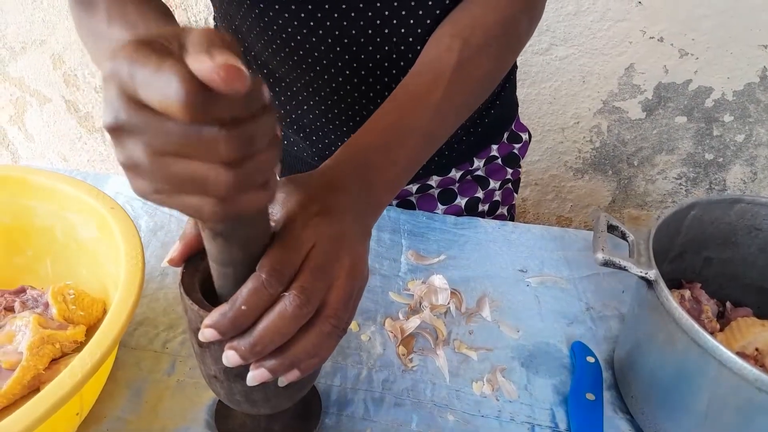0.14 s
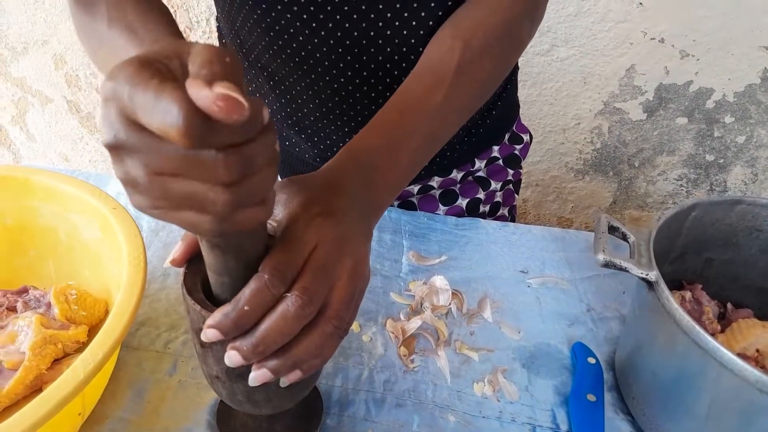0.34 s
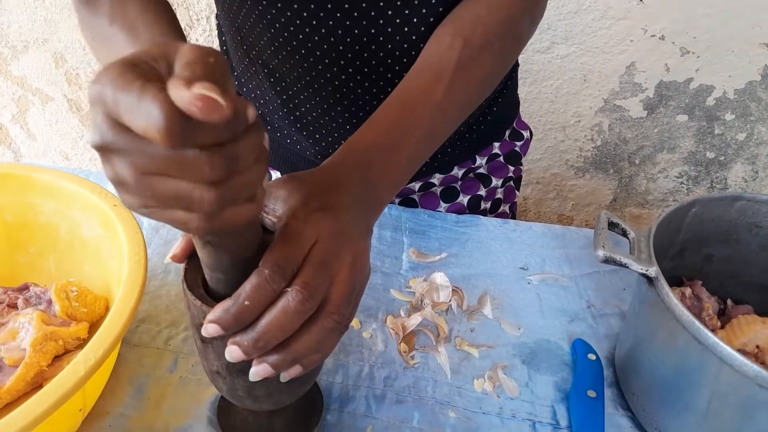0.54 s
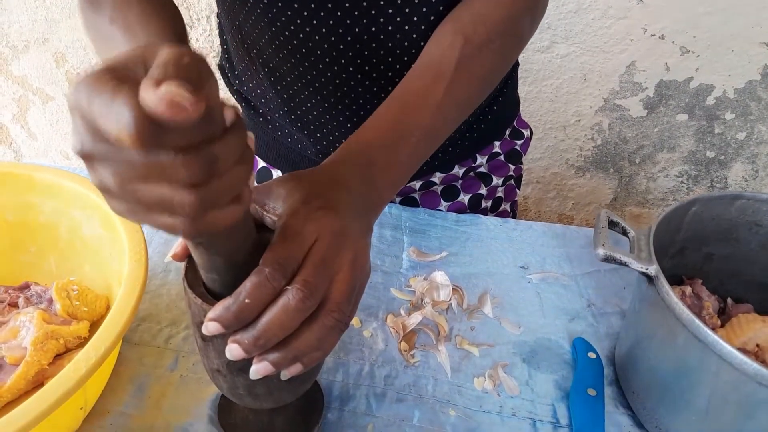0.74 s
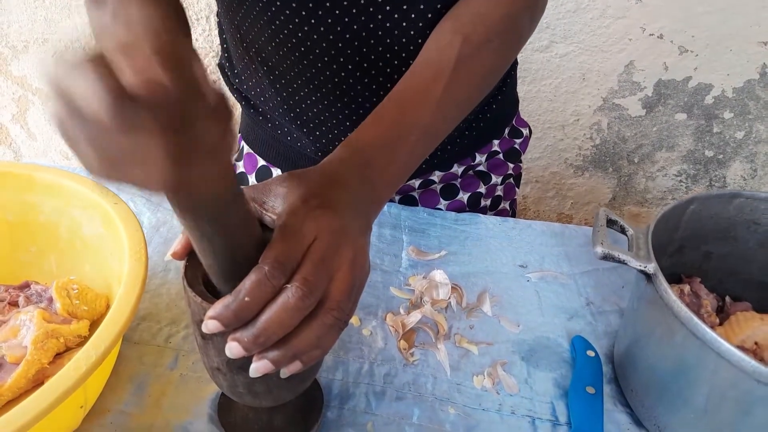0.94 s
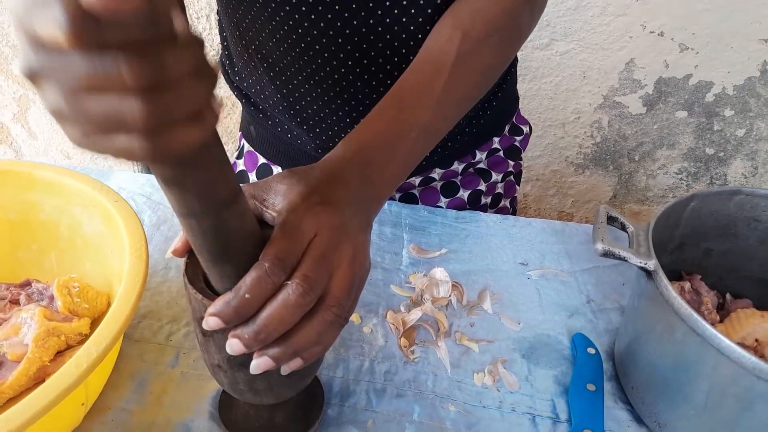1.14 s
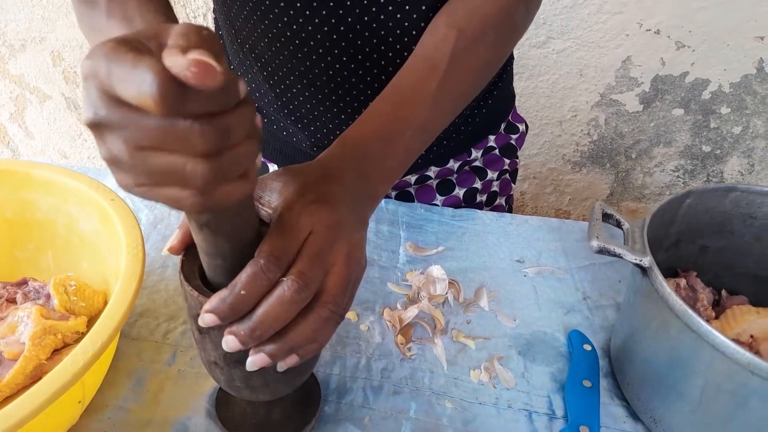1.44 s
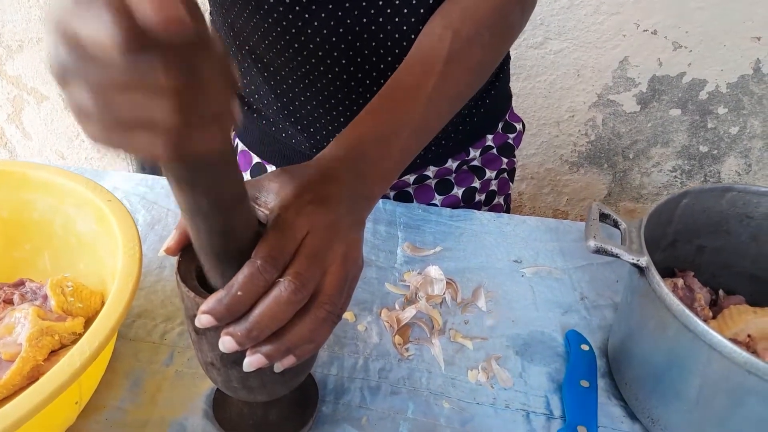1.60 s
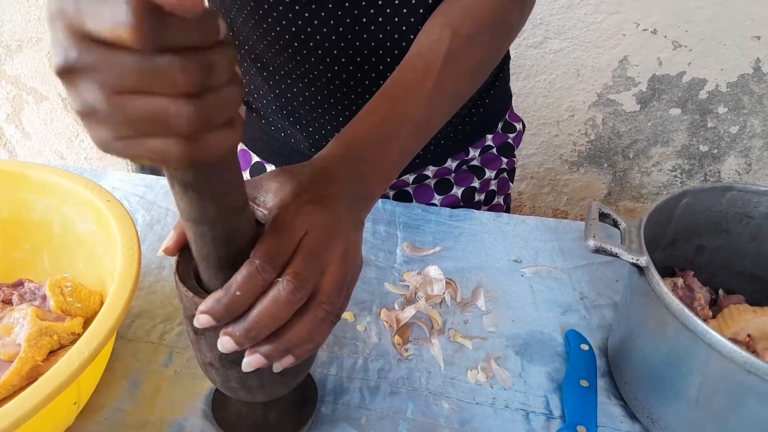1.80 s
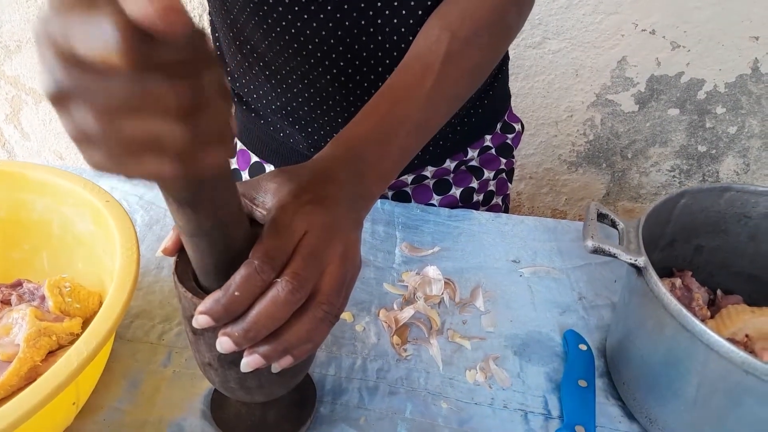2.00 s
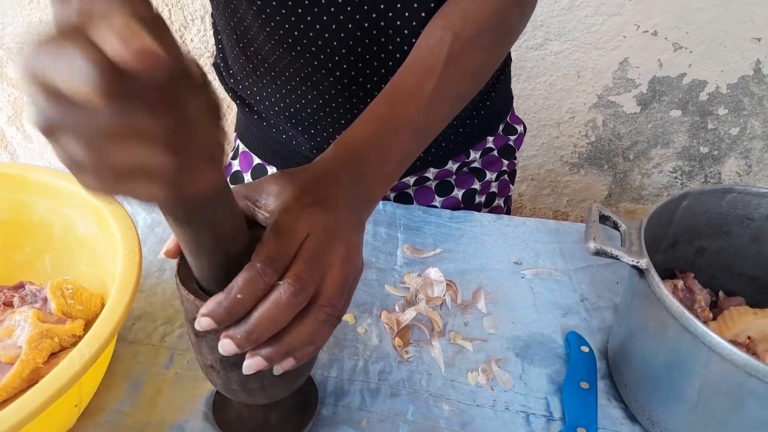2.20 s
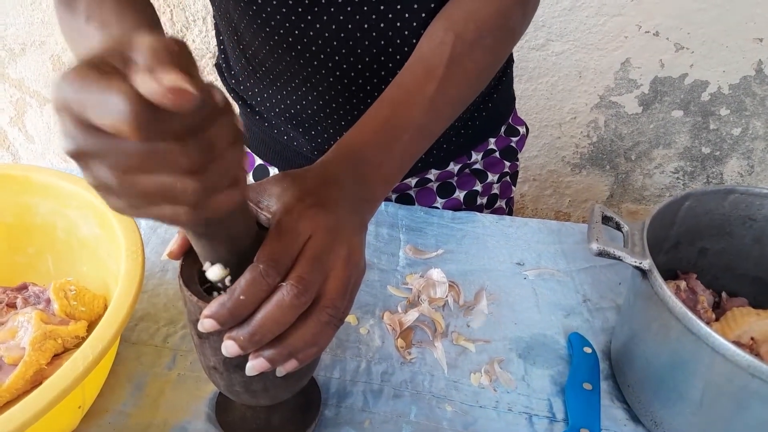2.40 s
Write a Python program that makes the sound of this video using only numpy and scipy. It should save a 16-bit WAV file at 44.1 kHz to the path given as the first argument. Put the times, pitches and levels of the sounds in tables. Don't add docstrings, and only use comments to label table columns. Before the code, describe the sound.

Wooden pestle pounding garlic in a wooden mortar, steady low thuds with wet crunch and metal rattle

```python
import sys
import numpy as np
from scipy import signal
from scipy.fft import rfft, irfft, next_fast_len
from scipy.io import wavfile
from scipy.ndimage import uniform_filter1d

SR = 44100
rng = np.random.default_rng(int(sys.argv[2]) if len(sys.argv) > 2 else 0)


def unload_audio(sound):
    columns = np.transpose(np.atleast_2d(sound))
    steps = np.round(np.clip(columns, -1, 1) * 32767)
    wavfile.write(sys.argv[1], SR, steps.astype(np.int16))


def convert_level_to_amplitude(level_db):
    exponent = np.asarray(level_db, float) / 20
    return 10 ** exponent


N = 112454
FFT = next_fast_len(N)
OPPOSITE = np.array([[1], [-1]])

# t/s, level/dB, upper
# table modes/dB, contact/ms, ring share/1
THUDS = [(0.001, -34, -8.5, 3.04, 0.5), (0.147, -14.5, -15.5, 3.64, 0.67),
         (0.359, -27.5, -14.5, 2.75, 0.64), (0.369, -19.5, -20.5, 0.63, 0.21), (0.595, -19, -8, 2.6, 0.8),
         (0.811, -23.5, -2.5, 3.7, 0.61), (0.827, -12, -24, 5.1, 1), (1.047, -4, -17.5, 6.35, 0.69),
         (1.057, -13, -14.5, 2.85, 0.94), (1.281, -5, -17, 5.7, 0.2), (1.298, -11.5, -20.5, 2.1, 0.71),
         (1.503, -9.5, -12.5, 3.1, 0.64), (1.524, -11.5, -13.5, 3.9, 0.57), (1.732, -18.5, -4.5, 3.54, 1),
         (1.741, -9, -9.5, 2.97, 0.83), (1.769, -26.5, -7, 3.2, 0.65), (1.955, -9, -12, 3.17, 0.66),
         (1.975, -12, -5.5, 5.9, 0.62), (2.172, -23.5, -5.5, 4.1, 0.73), (2.177, -13.5, -9, 4.66, 1),
         (2.392, -24.5, -4, 2.8, 0.75)]
# t/s, level/dB
BUMPS = [
    (0.079, -24.5),
    (0.238, -23),
    (0.52, -30),
    (0.738, -23.5),
    (0.932, -19.5),
    (1.386, -13.5),
    (1.587, -24),
    (2.287, -15),
    (2.327, -16.5),
    (2.497, -26),
]
# t/s, level/dB
POT_SWAYS = [
    (0.811, -32.5),
    (1.05, -27),
    (1.286, -30),
    (1.505, -29),
    (1.736, -21.5),
    (1.957, -23.5),
    (2.176, -25),
]
# t of the peak/s, level/dB, swell/ms, fade/ms
SQUASHES = [(.147, -31.5, 8.2, 5.2), (0.237, -53, 25, 66), (0.372, -28, 4.6, 6.7), (0.597, -30, 7.9, 6),
            (0.633, -51, 15, 41), (.768, -50, 27, 27), (0.824, -25, 5.7, 1.2), (.90, -49.5, 69, 55),
            (1.049, -29, 11.9, 9.9), (1.28, -28.5, 8.4, 4.2), (1.505, -21.5, 5.1, 1.5),
            (1.596, -49, 8.5, 20), (1.7295, -29, 0.61, 2.4), (1.733, -27.5, 1.1, 1.9),
            (1.954, -26, 4.1, 0.98), (2.175, -29.5, 6.1, 7.8), (2.244, -53.5, 9.2, 9.1),
            (2.395, -24.5, 3.4, 6.3)]
# t/s, level/dB, bowl ring/dB, upper bowl modes/dB, rustle/dB
RIM_KNOCKS = [
    (0.3311, -20.5, -10.5, 2, -6.5),
    (0.5848, -35, 4, -10.5, 5),
    (0.8087, -27.5, 9.5, -12, -0.5),
    (1.4433, -20.5, -6.5, 4.5, -6.5),
]
# t/s, level/dB, bowl ring/dB, rustle/dB
WALL_SLAPS = [
    (1.048, -14.5, -17, -5),
    (2.3898, -7, -26.5, -25),
]
# t/s, level/dB, top modes/dB, long ring/dB
RATTLES = [(1.0525, -20, -22, -14), (1.0577, -10, -8, -17), (1.061, -24, 4.5, -12),
           (1.0663, -20.5, -6, -10), (1.299, -15.5, -10, -13), (1.311, -32.5, -11, -2),
           (1.512, -25.5, -15, -5), (1.523, -24, -11, -11), (1.7346, -25, -6, -11),
           (1.7388, -12.5, -7, -12), (1.7431, -13.5, -7, -1), (1.748, -25, -5, 0), (1.753, -16.5, -23, -13),
           (1.764, -32, -15, -11), (1.7705, -23, -8, -8), (1.7726, -22, -13, -5), (1.9595, -6.5, -7, -1),
           (1.962, -20, 4, -3), (1.963, -21.5, -8, -1), (1.978, -15, -6.5, -4), (1.981, -27, 0, -6),
           (1.985, -22, -1.5, -3), (1.991, -26.5, -11, 2), (2.008, -27, -10, 4), (2.023, -34, -7, 5),
           (2.175, -29, 5, -15), (2.187, -19, -9, 0.5), (2.197, -20, -9, -5)]

# f/Hz, level/dB, time to fall 60 dB/s
TABLE_LOW = [(51.4, -14.5, 0.2), (83.5, -4.5, 0.16), (131, -25, 0.33), (134.95, -1, 0.26), (193, -9, 0.11)]
TABLE_HIGH = [(240.3, -10, 0.2), (260.35, -0.5, 0.29), (288.6, -13, 0.22), (441, -15, 0.12),
              (492.4, -12.5, 0.19), (602, -5.5, 0.096), (807, -8, 0.042)]
POT = [(179.5, -8, 0.2), (200.3, -2, 0.29), (232.7, -4, 0.28)]
RIM = [(1940, -4.5, 0.021), (2320, -3.5, 0.012), (2116, -20.5, 0.077), (3300, -27, .015),
       (4320, -18.5, 0.015), (4940, -23.5, 0.02), (6770, -16, 0.012)]
WALL = [(2110, 2.5, 0.012), (1966, -13, 0.024), (2200, -7.5, 0.013), (2500, -23, 0.018),
        (2130, -38.5, 0.41), (2100, -37, 0.14), (3620, -16, 0.011)]
BOWL = [(249, 1, 0.22), (453, 0, .08), (504.6, 2.5, .2), (838.5, 1.5, 0.14), (1020, -10.5, 0.18)]
BOWL_TOP = [(644, -6.5, 0.18), (748, -2, 0.21), (1175, -7.5, 0.056)]
METAL = [(2120, -27, 0.031), (2762, -23.5, 0.024), (3024, -22.5, 0.021), (4350, -30, 0.019),
         (4619, -10, 0.017), (4820, -22, 0.021), (5930, -27.5, 0.025)]
METAL_LONG = [(2817, -22, 0.081), (4300, -28, 0.081), (4520, -17.5, 0.065), (4600, -31, 0.031),
              (5050, -33, 0.077)]
METAL_TOP = [(6490, -10, 0.017), (6650, -8, 0.033), (7470, -11, 0.018), (8100, -14, 0.017),
             (9500, -18, .015), (11100, -22, 0.023), (10500, -20, 0.025), (11450, -18, 0.038),
             (12800, -22, 0.026), (14200, -30, 0.022), (15000, -19, 0.023)]

# f/Hz, level/dB
JUICE = [(1400, -5), (2200, -3.5), (2900, -6), (4000, -8.5), (5500, -10.5), (7000, -2), (12500, -3.5),
         (15500, -19)]
# f/Hz, width/Hz, boost/dB
HOLLOW = [(2214, 320, 8.5), (3416, 460, 11.5), (4800, 590, 7.5), (7160, 480, 4.5)]
# f/Hz, level per Hz/dB
WOOD = [(150, 10.5), (300, 5.5), (600, 0.5), (1200, -10), (1600, -12.5), (2200, -13.5), (5000, -26),
        (9000, -47)]
# f/Hz, level/dB
YARD = [(25, -26), (50, 10), (120, -1.5), (260, -17.5), (500, -24.5), (1200, -24.5), (5000, -33),
        (15500, -32.5)]
# f/Hz, gain/dB
MIC = [(1190, 1.5), (1400, -5), (2200, 3.5), (3300, 1.5), (4800, 8.5), (6900, 5.5), (8900, -13),
       (11800, -4.5)]
# f/Hz, left minus right/dB
PORTS = [(60, -1), (700, -2), (1290, -0.5), (2380, 5), (4400, 1.5), (8120, 16), (12000, 21.5), (15000, -4)]


def pounding():
    s, db, upper_db, ms, share = np.array(THUDS).T
    bump_s, bump_db = np.array(BUMPS).T
    sway_s, sway_db = np.array(POT_SWAYS).T
    table = strike(TABLE_LOW, s, db - 0.5, ms, share)
    table = table + strike(TABLE_HIGH, s, db + upper_db + 4.5, ms / 2, share)
    pot = strike(POT, sway_s, sway_db, 1.6)
    bumps = strike(TABLE_LOW, bump_s, bump_db + 1.3, 9.54, 0.59)
    return table + pot + shiver(s, db + upper_db - 15.0) + bumps


def garlic():
    ms = np.arange(N) / SR * 1000
    hz = np.fft.rfftfreq(FFT, 1 / SR)
    swell = np.zeros(N)
    for s, db, up_ms, down_ms in SQUASHES:
        from_peak = ms - s * 1000
        swell += convert_level_to_amplitude(db) * np.exp(-np.abs(from_peak) / np.where(from_peak < 0, up_ms, down_ms))
    grain_db = 1.8 * uniform_filter1d(rng.standard_normal(N), 40) * 6.3
    noise = rng.standard_normal((2, N)) * convert_level_to_amplitude(grain_db)
    hollow_db = sum(db / (1 + (2 * (hz - f) / width) ** 2) for f, width, db in HOLLOW)
    mid, side = colour(noise, curve(JUICE) * convert_level_to_amplitude(hollow_db))
    return swell * (mid + 0.54 * side * OPPOSITE) * 1.473


def rim():
    s, db, bowl_db, top_db, rustle_db = np.array(RIM_KNOCKS).T
    slap_s, slap_db, ring_db, slap_rustle_db = np.array(WALL_SLAPS).T
    both_s = np.r_[s, slap_s]
    crack_ms = 2.4
    crack = fades(s, db - 18.5, crack_ms * 0.0083) * rng.standard_normal(N)
    ticks = strike(RIM, s, db + 6, 0.081, rise_ms=0.38) + crack
    ticks = ticks + strike(WALL, slap_s, slap_db + 2.5, 0.22, rise_ms=0.33)
    body = strike(BOWL_TOP, s, db + bowl_db + top_db - 8, 0.12)
    body = body + shiver(both_s, np.r_[db + rustle_db, slap_db + slap_rustle_db] - 4.0)
    body = body + strike(BOWL, both_s, np.r_[db + bowl_db, slap_db + ring_db] - 9.5, 0.13, odd=-0.97)
    return body + ticks * favour_left(7)


def clank():
    s, db, top_db, long_db = np.array(RATTLES).T
    short = strike(METAL, s, db + 6.5, 0.03, rise_ms=0.62)
    long = strike(METAL_LONG, s, db + long_db + 3.5, 0.03, rise_ms=0.62)
    bright = strike(METAL_TOP, s, db + top_db + 1, 0.03, rise_ms=0.62)
    return short + long + bright


def utensil():
    apart = 0.59
    left = clank()
    return np.array([left, (1 - apart) * left + apart * clank()])


def shiver(times, dbs):
    x = colour(rng.standard_normal((2, N)), curve(WOOD))
    mid, side = x
    return fades(times, dbs, 0.28) * (mid + 0.43 * side * OPPOSITE) / x.std()


def walls(near):
    tail_db, t60_s = -15, 0.2
    t = np.arange(SR // 2) / SR
    tail = rng.standard_normal((2, len(t))) * convert_level_to_amplitude(-60 * t / t60_s) * (t > 0.003)
    energy = (tail ** 2).sum(1, keepdims=True)
    tail = signal.lfilter([1, -1], [1, -0.96], tail) * convert_level_to_amplitude(tail_db) / np.sqrt(energy)
    return signal.fftconvolve(near, tail, axes=1)[:, :N]


def yard():
    level_db, alike_hz, gust_db, flicker_db = -39, 1000, 3, 0.36
    hz = np.fft.rfftfreq(FFT, 1 / SR)
    mid, side = rng.standard_normal((2, N))
    unlike = np.clip(0.039 + 45 / (hz + 1) + hz / alike_hz, 0, 1)
    x = colour(mid, curve(YARD)) + colour(side, curve(YARD) * unlike) * OPPOSITE
    gust = uniform_filter1d(uniform_filter1d(rng.standard_normal(N), 2500), 2500)
    gust = gust / gust.std()
    rumble = colour(x, 1 / (1 + (hz / 300) ** 2))
    x = x + rumble * (convert_level_to_amplitude(gust_db * gust) - 1)
    x = x * convert_level_to_amplitude(flicker_db * np.roll(gust, N // 2))
    return x * convert_level_to_amplitude(level_db) / x.std()


def whine():
    tone_hz, level_db, peak_s, span_s = 1174, -61, 1.6, 0.28
    band = signal.butter(2, [tone_hz - 25, tone_hz + 25], "band", fs=SR, output="sos")
    x = signal.sosfilt(band, rng.standard_normal((2, N)))
    swell = 0.074 + np.exp(-((np.arange(N) / SR - peak_s) / span_s) ** 2)
    return x / x.std() * convert_level_to_amplitude(level_db) * swell


def strike(modes, times, dbs, contact_ms, ring_share=1, odd=1, rise_ms=0):
    scatter_db, detune = 1.5, 0.004
    out = np.zeros(N)
    chance = rng.standard_normal((len(times), 2, len(modes), 1))
    f, db, t60 = np.array(modes, float).T[:, :, None]
    t = np.arange(int(1.5 * t60.max() * SR)) / SR
    rise = 1 - np.exp(-t * 1000 / max(rise_ms, 1e-3))
    blows = zip(*np.broadcast_arrays(times, dbs, contact_ms, ring_share), chance)
    for s, level_db, ms, share, (weight, tuning) in blows:
        decay = convert_level_to_amplitude(db + scatter_db * weight - 60 * t / t60 / max(share, 0.1))
        ring = decay * np.sin(2 * np.pi * f * (1 + detune * tuning) * t) * rise
        ring = ring[::2].sum(0) + odd * ring[1::2].sum(0)
        n = max(ms * SR / 1000, 2.0)
        push = np.sin(np.pi * np.arange(int(n) + 1) / n)
        hit = signal.fftconvolve(ring, push / push.sum()) * convert_level_to_amplitude(level_db)
        i = int(s * SR)
        out[i:i + len(hit)] += hit[:N - i]
    return out


def fades(times, dbs, t60):
    kicks = np.bincount((np.array(times) * SR).astype(int), convert_level_to_amplitude(dbs), N)
    return signal.lfilter([1], [1, -convert_level_to_amplitude(-60 / t60 / SR)], kicks)


def favour_left(db):
    return convert_level_to_amplitude(db * np.array([[0], [-1]]))


def curve(table):
    f, db = np.array(table, float).T
    hz = np.fft.rfftfreq(FFT, 1 / SR)
    return convert_level_to_amplitude(np.interp(np.log(hz + 1), np.log(f), db))


def colour(x, gain):
    return irfft(rfft(x, FFT) * gain, FFT)[..., :N]


def scene():
    no_rumble = signal.butter(2, 45, "high", fs=SR, output="sos")
    near = signal.sosfilt(no_rumble, pounding()) + rim()
    near = near + (utensil() + garlic()) * favour_left(5.5)
    return near + walls(near) + yard() + whine()


def band_limit(x):
    return signal.sosfilt(signal.butter(12, 16480, fs=SR, output="sos"), x)


def record(dry):
    bass_lag_ms, treble_lag_ms, lag_turn_hz = 0.073, 0.052, 1300
    bass_cut_hz, top_hz, headroom = 66.5, 15900, 0.9
    hz = np.fft.rfftfreq(FFT, 1 / SR)
    half = np.sqrt(curve(PORTS))
    bass_to_treble = 1 / (1 + (lag_turn_hz / (hz + 1)) ** 6)
    lag_ms = bass_lag_ms + (treble_lag_ms - bass_lag_ms) * bass_to_treble
    lag = np.exp(-2j * np.pi * hz * lag_ms / 1000)
    ports = np.array([half * lag, 1 / half]) * 2 / (half + 1 / half)
    top_cut = 1 / (1 + (hz / top_hz) ** 60)
    x = colour(dry, curve(MIC) * ports * top_cut)
    x = signal.sosfilt(signal.butter(3, bass_cut_hz, "high", fs=SR, output="sos"), x)
    mix = colour(np.clip(x, -headroom, headroom), top_cut)
    return band_limit(mix)


dry = scene()
out = record(dry)
unload_audio(out)
```